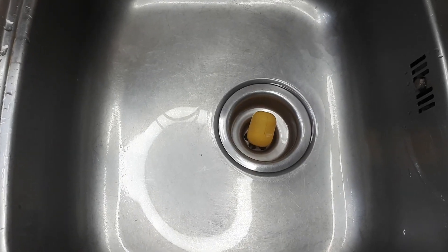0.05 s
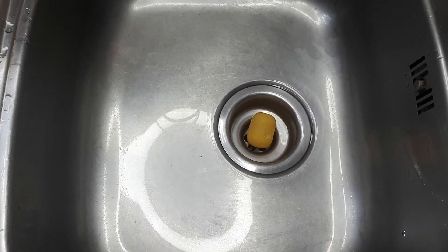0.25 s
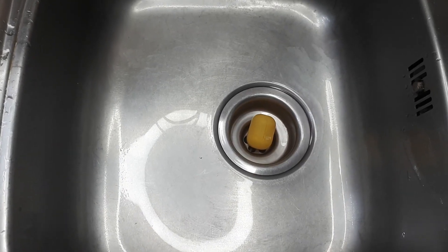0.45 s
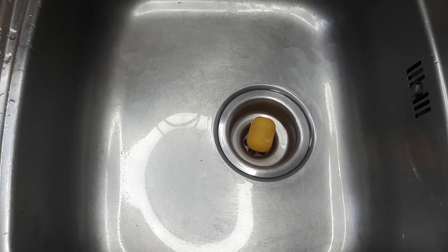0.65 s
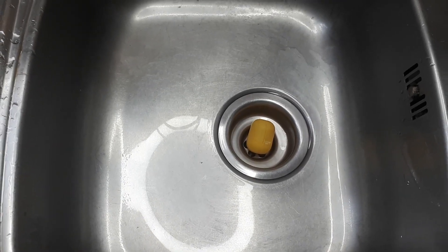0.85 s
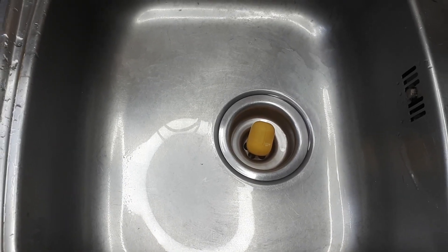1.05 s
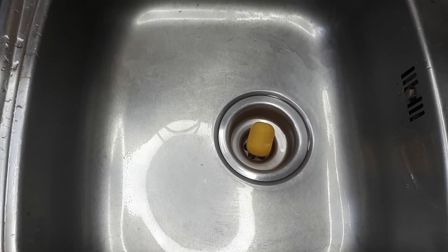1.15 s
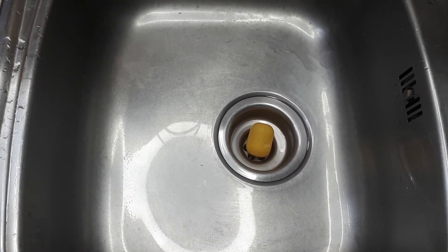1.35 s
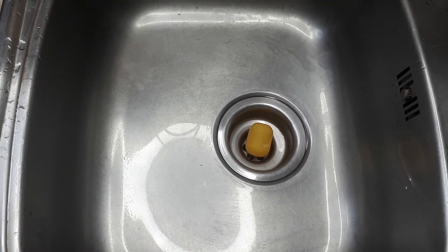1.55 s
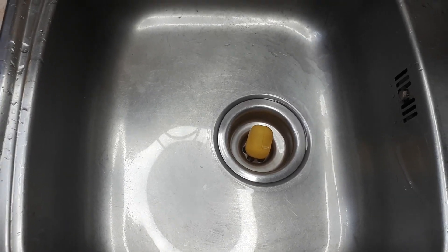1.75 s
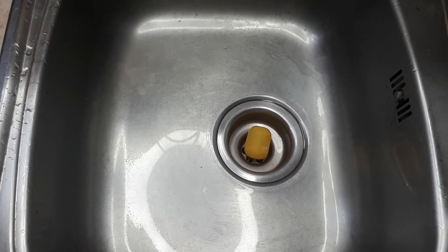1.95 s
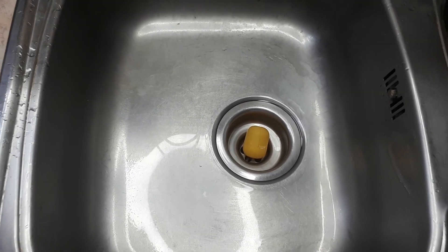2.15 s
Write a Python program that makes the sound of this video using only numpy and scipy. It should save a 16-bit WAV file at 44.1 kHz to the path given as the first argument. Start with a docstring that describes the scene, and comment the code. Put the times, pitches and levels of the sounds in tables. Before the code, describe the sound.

Water gurgles and glugs down the drain of a steel kitchen sink.

```python
"""The last water gurgles down the drain of a steel kitchen sink, heard from just above the basin.
Each gulp of air thumps the trap, rings a large bubble and splashes. Low glugs slide in pitch,
small bubbles ping and films burst, over a bed of bubbling that follows the flow. All of it sounds
through the resonances of the waste pipe and basin, then dies away into a quiet room."""
import sys
import numpy as np
from scipy import signal
from scipy.fft import rfft, irfft
from scipy.io import wavfile
from scipy.ndimage import uniform_filter1d

SR = 44100
rng = np.random.default_rng(int(sys.argv[2]) if len(sys.argv) > 2 else 0)


def wav_record(signal):
    """Record a signal, one row per channel, as 16-bit PCM in the file named by sys.argv[1]."""
    frames = np.transpose(np.atleast_2d(signal))
    bounded = np.clip(frames, -1, 1)
    # unit amplitude maps onto the largest positive 16-bit level
    quanta = np.round(bounded * 32767).astype(np.int16)
    wavfile.write(sys.argv[1], SR, quanta)


N = 97020
RING = np.arange(int(.45 * SR)) / SR  # time axis of one event, in seconds
SMALL_BUBBLE_GLIDE_PER_S = 0.88  # upward chirp, as a fraction of the pitch


def gulps(spots):
    """Air breaks through the trap: a low thump, a cluster of bubbles and a splash."""
    # gulps of air: start_s, thump_db, thump_hz, bubble_db, bubble_hz, splash_db
    gulp_cues = [(0.02, -41, 155, -45, 870, -50.5), (0.222, -43, 166, -38.5, 500, -58),
                 (0.243, -42, 162, -35.5, 665, -52.5), (0.263, -37, 153, -45, 646, -51),
                 (0.278, -30.5, 156, -33, 600, -38), (0.315, -31, 174, -32, 580, -35),
                 (0.339, -33, 187, -44, 790, -35.5), (0.372, -44, 133, -41.5, 880, -48),
                 (0.405, -44, 158, -39.5, 574, -57), (0.446, -35, 120, -43.5, 980, -51.5),
                 (0.5, -28.5, 166, -28.5, 774, -43), (0.516, -29, 110, -38, 960, -48),
                 (0.561, -34, 179, -41.5, 434, -51), (0.583, -27.5, 173, -38, 373, -43),
                 (0.623, -32, 180, -34, 400, -46.5), (0.678, -33, 187, -37, 900, -48.5),
                 (0.697, -35.5, 152, -43.5, 444, -54), (0.744, -33.5, 185, -26, 580, -62),
                 (0.778, -37.5, 150, -39.5, 850, -60), (0.785, -28, 160.6, -34, 696, -49),
                 (0.827, -25.5, 187.6, -29.5, 910, -38), (0.853, -27.5, 164, -69, 1030, -45),
                 (0.879, -32, 134, -39, 870, -48.5), (0.928, -32, 140, -39, 720, -50.5),
                 (0.994, -37, 157, -43.5, 423, -54), (1.012, -37, 174, -36.5, 513, -58),
                 (1.046, -29.5, 176, -38.5, 393, -58), (1.113, -26, 173, -24.5, 667, -39),
                 (1.15, -45, 115, -46, 627, -44.5), (1.202, -30, 152, -33.5, 430, -38),
                 (1.266, -37, 121, -38, 520, -49), (1.313, -43.5, 168, -40, 536, -63),
                 (1.369, -32.5, 150, -40, 794, -43), (1.421, -27.5, 169, -33.5, 860, -45.5),
                 (1.491, -30.5, 133, -34, 710, -48.5), (1.512, -31.5, 163, -39, 473, -50),
                 (1.541, -28, 147, -36.5, 437, -45), (1.597, -35.5, 134, -50, 594, -58.5),
                 (1.645, -37.5, 124, -39.5, 640, -51), (1.704, -35.5, 141, -39.5, 850, -57.5),
                 (1.724, -65, 153, -39.5, 670, -52), (1.739, -33, 156, -41.5, 710, -51),
                 (1.797, -34.5, 165, -43.5, 720, -50.5), (1.82, -37, 169, -52, 860, -47.5),
                 (1.843, -35.5, 156, -39.5, 740, -63), (1.89, -42, 120, -42, 790, -70),
                 (1.912, -36.5, 146, -46, 840, -58.5), (1.936, -37, 138, -47.5, 1000, -54)]
    thump_trim_db, bubble_trim_db, splash_trim_db = 0.5, -2, -9.5
    thump_lag_s = 0.002933  # the water column swings just after the bubble breaks
    out = np.zeros((2, N))
    for start_s, thump_db, thump_hz, bubble_db, bubble_hz, splash_db in gulp_cues:
        thump = bubble(thump_hz, t60_s=0.031, glide_per_s=-0.34)
        play_in_drain(out, spots, start_s + thump_lag_s, thump_db + thump_trim_db, thump)
        play_in_drain(out, spots, start_s, bubble_db + bubble_trim_db, bubble_cluster(bubble_hz))
        splash = patter(t60_s=0.036, edges_hz=[2500, 4090], kind="band")
        play_in_drain(out, spots, start_s, splash_db + splash_trim_db, splash)
    return out


def bubble_cluster(pitch_hz):
    """A large bubble sheds three smaller ones that ring just after it, higher and softer."""
    t60_s, shed_db, shed_within_s, shed_octaves = 0.0037, -10, 0.00599, .5
    cluster = bubble(pitch_hz, t60_s)
    for delay_s, octaves in rng.random((3, 2)) * [shed_within_s, shed_octaves]:
        ratio = 2 ** octaves
        shed = from_db(shed_db) * bubble(pitch_hz * ratio, t60_s) / ratio
        cluster += np.pad(shed, (int(delay_s * SR), 0))[:len(RING)]
    return cluster


def bubble(pitch_hz, t60_s, glide_per_s=0):
    """An air pocket swells within a cycle and rings down, its pitch gliding as it moves."""
    attack_cycles = 0.48
    phase = 2 * np.pi * pitch_hz * (RING + glide_per_s * np.minimum(RING, t60_s * 2) * RING / 2)
    swell = 1 - np.exp(-RING * pitch_hz / attack_cycles)
    return np.diff(np.sin(phase) * swell * decay(t60_s), prepend=0)


def glugs(spots):
    """A long air pocket swells and fades, gliding in pitch as it changes size."""
    # air drawn down the trap: start_s, level_db, start_hz, end_hz, length_s
    glug_cues = [(.335, -34.5, 206, 153, 0.034), (.366, -28, 130, 105, 0.03),
                 (.822, -25.5, 199.9, 182.2, 0.043), (.932, -32.5, 142, 207, 0.036),
                 (1.13, -32.5, 129, 89.5, 0.037), (1.215, -31, 193, 170, 0.043)]
    out = np.zeros((2, N))
    for start_s, level_db, start_hz, end_hz, length_s in glug_cues:
        progress = np.minimum(RING / length_s, 1)
        phase = 2 * np.pi * np.cumsum(start_hz + (end_hz - start_hz) * progress) / SR
        play_in_drain(out, spots, start_s, level_db, np.sin(phase) * np.sin(np.pi * progress))
    return out


def pings(spots):
    """Single bubbles ping at the strainer, each with the crackle of its film tearing."""
    # ringing bubbles: start_s, level_db, pitch_hz
    ping_cues = [(.28, -39, 3430), (0.454, -62, 7700), (.462, -47, 3780), (0.511, -58, 7270),
                 (0.578, -37, 2830), (0.584, -54.5, 5770), (.783, -35.5, 2280), (.783, -37, 2810),
                 (.784, -48, 7840), (.907, -43.5, 3430), (1.053, -43.5, 3270), (1.115, -21.5, 603),
                 (1.123, -53.5, 6260), (1.15, -38.5, 1810), (1.187, -39, 2750), (1.206, -52, 3590),
                 (1.225, -50, 6160), (1.394, -32, 1540), (1.394, -34.5, 2890), (1.421, -24.5, 605),
                 (1.446, -52, 7100), (1.514, -51, 4730), (1.544, -56.5, 6500), (1.641, -65.5, 7750),
                 (1.723, -59, 6270), (1.763, -52, 3080), (1.796, -28.5, 800), (1.819, -51, 7300),
                 (1.849, -61, 7740), (1.913, -60.5, 7540)]
    ping_trim_db, crackle_trim_db = -6.5, -16
    out = np.zeros((2, N))
    for start_s, level_db, pitch_hz in ping_cues:
        t60_s = 0.0088 * np.sqrt(3000 / pitch_hz)  # lower bubbles ring longer
        ping = bubble(pitch_hz, t60_s, SMALL_BUBBLE_GLIDE_PER_S)
        play_in_drain(out, spots, start_s, level_db + ping_trim_db, ping)
        octave_hz = [pitch_hz / np.sqrt(2), pitch_hz * np.sqrt(2)]
        crackle = patter(t60_s=0.014, edges_hz=octave_hz, kind="band")
        play_in_drain(out, spots, start_s, level_db + crackle_trim_db, crackle)
    return out


def sprays(spots):
    """Water films burst into a bright spray."""
    # bursting films: start_s, level_db, t60_s, low_cut_hz
    spray_cues = [(.001, -51, 0.16, 785), (.280, -63.5, 0.017, 4440), (.316, -61.5, 0.1, 2000),
                  (0.336, -50.5, 0.062, 5000), (0.676, -58.5, 0.083, 4440), (0.781, -54, 0.023, 5100),
                  (.828, -55.5, 0.059, 4550), (0.852, -62, 0.11, 2240), (1.115, -61, 0.15, 4540),
                  (1.219, -66, 0.084, 4500), (1.366, -66.5, 0.018, 4670), (1.543, -63, 0.058, 2740)]
    out = np.zeros((2, N))
    for start_s, level_db, t60_s, low_cut_hz in spray_cues:
        play_in_drain(out, spots, start_s, level_db, patter(t60_s, low_cut_hz, "high"))
    return out


def patter(t60_s, edges_hz, kind):
    """Droplets scatter in a short burst of spiky, filtered noise."""
    drops = rng.standard_normal(len(RING)) * rng.exponential(1, len(RING)) * decay(t60_s)
    return signal.sosfilt(signal.butter(2, edges_hz, kind, fs=SR, output="sos"), drops + 1e-18)


def bubbling(spots):
    """Random bubbles in three size ranges ring the drain, their level riding the flow."""
    # bubble size ranges: low_hz, high_hz, bubbles_per_s, t60_s, trim_db
    size_ranges = [(74, 217, 300, 0.025, 1), (382, 669, 470, .02, -4), (1390, 4540, 640, 0.005, -24.5)]
    # level of the trickling flow: time_s, level_db
    flow = [(0, -44), (.11, -71), (.21, -73), (0.26, -32.5), (.43, -49), (0.901, -41.5), (1.3, -38),
            (1.624, -46), (1.941, -49), (2.019, -58.5), (2.2, -108)]
    flow_db = np.interp(np.arange(N) / SR, *np.transpose(flow))
    out = np.zeros((2, N))
    for spot, (low_hz, high_hz, bubbles_per_s, t60_s, trim_db) in zip(spots, size_ranges):
        stream = np.zeros(N)
        pitches_hz = np.geomspace(low_hz, high_hz, 10)
        for pitch_hz in pitches_hz:
            onsets = rng.random(N) < bubbles_per_s / len(pitches_hz) / SR
            accents_db = np.minimum(rng.exponential(3, N), 9)
            blip = bubble(pitch_hz, t60_s, SMALL_BUBBLE_GLIDE_PER_S)
            stream += signal.fftconvolve(onsets * from_db(accents_db), blip / rms(blip))[:N]
        layer = signal.fftconvolve(spot, stream[None], axes=1)[:, :N]
        out += layer / rms(layer) * from_db(flow_db + trim_db)
    return out


def drain_responses(spot_count):
    """Stereo impulse responses round the plughole: shared pipe modes and room, a basin ring per spot."""
    # resonances of trap, pipe and basin: pitch_hz, level_db, t60_s, left_over_right_db, left_lead_rad
    modes = [(99, -8, .1, 0, 0), (129, -3, .11, 0, 0), (187, -5, .11, 2, 0), (302, -9, .15, 0, .3),
             (345, -3, .045, 0, .3), (444, -3, .1, 1, .4), (601, 2.5, .12, 9, .5), (858, -2.5, .1, 1, -.3),
             (1121, -1.5, .12, 1, .1), (1348, -3, .12, -6, -1.2), (1386, -2, .11, 1, -.6),
             (1630, -14, .055, 3, 0), (1803, -7.5, .085, 8, -1.5), (1995, -11, .06, -6, 1.3),
             (2205, -9, .05, 0, 1.3), (2720, -7, .1, 8, -.8), (2975, -4, .05, 8, -.8),
             (3460, -6, .06, 3, 0), (3720, -2.5, .07, 8, 0), (4536, -13.5, .08, 7, 0),
             (4690, -12.5, .04, 9, 0)]
    # dense upper modes of the steel basin: frequency_hz, density_db
    steel_tone = [(100, -28), (450, -7.5), (750, -13.5), (1000, -24), (2200, -9.5), (2500, -33),
                  (2850, -15.5), (3700, -20), (4050, -23), (5200, -29), (6300, -14), (8000, -21),
                  (9000, -28.5), (16000, -25)]
    # stereo position of the basin's ring: frequency_hz, left_over_right_db
    steel_pan = [(1500, 0), (2900, 8), (6500, 7), (11000, 3)]
    # stereo width of the basin's ring: frequency_hz, left_right_correlation
    steel_width = [(200, .95), (600, .3), (3000, .15)]
    basin_db, basin_t60_s, basin_build_s = -1, 0.063, 0.0075
    room_db, room_t60_s = -17.5, 0.43
    pipe = 0
    for pitch_hz, level_db, t60_s, pan_db, lead_rad in modes:
        phase = 2 * np.pi * pitch_hz * RING + lead_rad * np.array([[.5], [-.5]])
        pipe += from_db(level_db) * pan_gains(pan_db) * np.cos(phase) * decay(t60_s)
    size = len(RING)
    basin_gains = pan_gains(curve_at(steel_pan, np.fft.rfftfreq(size, 1 / SR)))
    room = stereo_noise(steel_tone, steel_width, size) * decay(room_t60_s)
    shared = pipe / rms(pipe) + from_db(room_db) * room / rms(room)
    spots = []
    for _ in range(spot_count):
        steel = irfft(rfft(stereo_noise(steel_tone, steel_width, size)) * basin_gains, size)
        basin = steel * decay(basin_t60_s) * (1 - decay(basin_build_s))
        spots.append(shared + from_db(basin_db) * basin / rms(basin))
    return spots


def play_in_drain(out, spots, start_s, level_db, sound):
    """Ring the drain from a random spot and mix it in, with its loudest 22 ms at level_db."""
    spot = spots[rng.integers(len(spots))]
    rung = signal.fftconvolve(spot, sound[None], axes=1)[:, :len(RING)]
    power = uniform_filter1d(rung.mean(0) ** 2, int(.022 * SR), mode="constant")
    start = int(start_s * SR)
    out[:, start:start + len(RING)] += from_db(level_db) * rung[:, :N - start] / np.sqrt(power.max())


def room_tone(level_db):
    """A quiet room: steady centred rumble under a faint, wide hiss."""
    # background spectrum: frequency_hz, density_db
    tone = [(25, -20), (45, -2), (80, -6.5), (130, -2.5), (200, -21), (320, -24), (600, -23.5), (1500, -28),
            (4000, -42.5), (9000, -44.5), (16000, -39)]
    # stereo width of the background: frequency_hz, left_right_correlation
    width = [(100, .98), (500, .6), (2000, .1)]
    return from_db(level_db) * stereo_noise(tone, width, N)


def stereo_noise(tone, width, size):
    """Coloured mid/side noise at unit rms."""
    hz = np.fft.rfftfreq(size, 1 / SR)
    mid, side = rfft(rng.standard_normal((2, size)))
    correlation = curve_at(width, hz)
    left_right = np.sqrt(1 + correlation) * mid + np.sqrt(1 - correlation) * side * [[1], [-1]]
    noise = irfft(from_db(curve_at(tone, hz)) * left_right, size)
    return noise / rms(noise)


def curve_at(points, hz):
    """Read a curve on a log-frequency axis."""
    points_hz, values = np.transpose(points)
    return np.interp(np.log(np.maximum(hz, 1)), np.log(points_hz), values)


def decay(t60_s):
    """An envelope that falls 60 dB in t60_s."""
    return np.exp(-np.log(1000) * RING / t60_s)


def pan_gains(left_over_right_db):
    """Left and right gains for a level difference."""
    return from_db(np.array([[1], [-1]]) * left_over_right_db / 2)


def from_db(db):
    """Decibels to gain."""
    return 10 ** (np.asarray(db) / 20)


def rms(x):
    """Root mean square."""
    return np.sqrt(np.mean(x ** 2) + 1e-30)


def scene():
    """The gurgling drain over its bubbling bed and the room tone."""
    spots = drain_responses(spot_count=8)
    bed = bubbling(spots)
    return gulps(spots) + glugs(spots) + pings(spots) + sprays(spots) + bed + room_tone(level_db=-59)


def record(dry):
    """The deepest bass rolls off and the top is cut steeply."""
    low_cut_hz, high_cut_hz = 8.7, 15900
    dry = signal.sosfilt(signal.butter(2, low_cut_hz, "high", fs=SR, output="sos"), dry)
    return signal.sosfilt(signal.ellip(10, .1, 80, high_cut_hz, fs=SR, output="sos"), dry)


dry = scene()
out = record(dry)
wav_record(out)
```